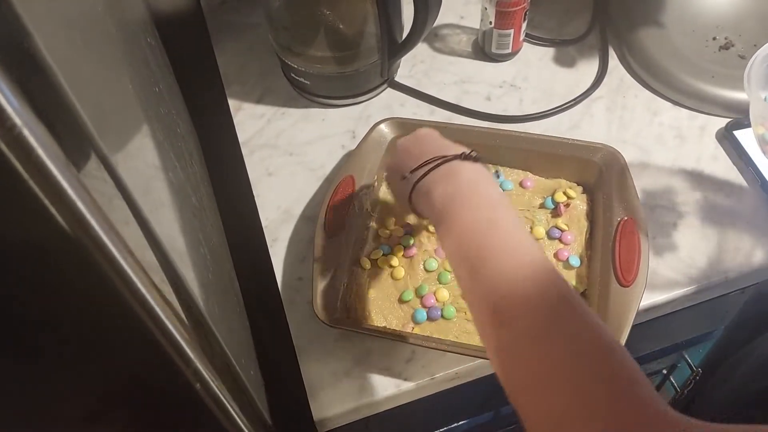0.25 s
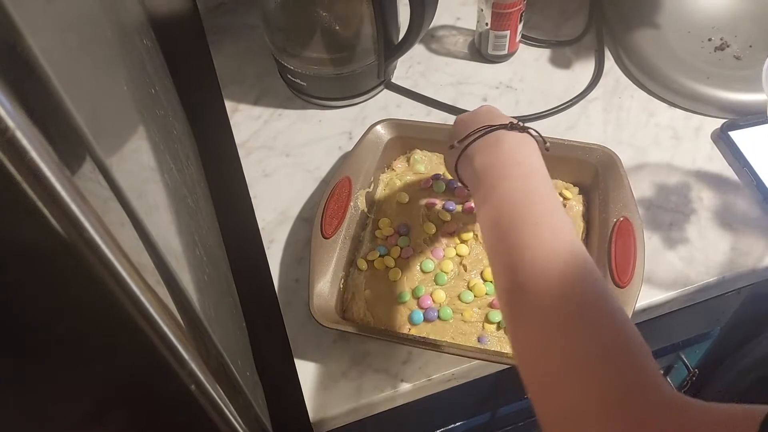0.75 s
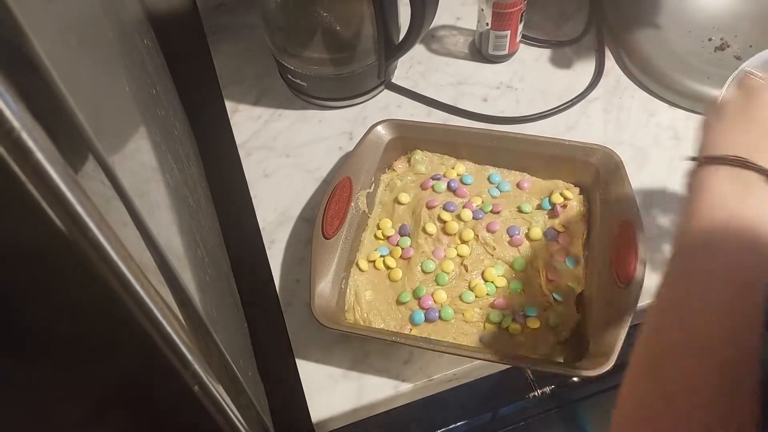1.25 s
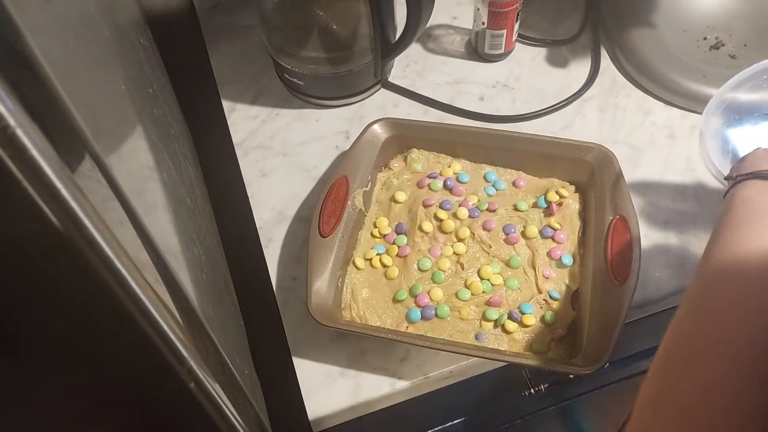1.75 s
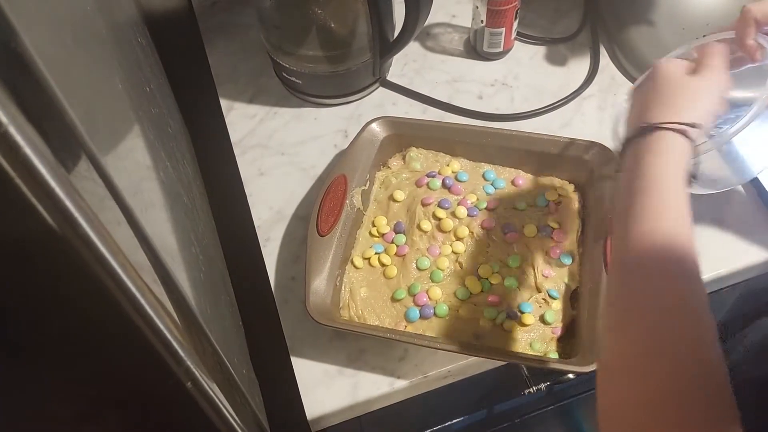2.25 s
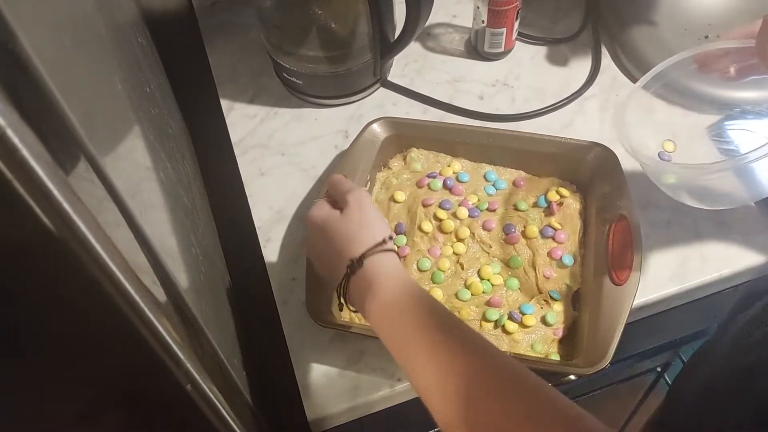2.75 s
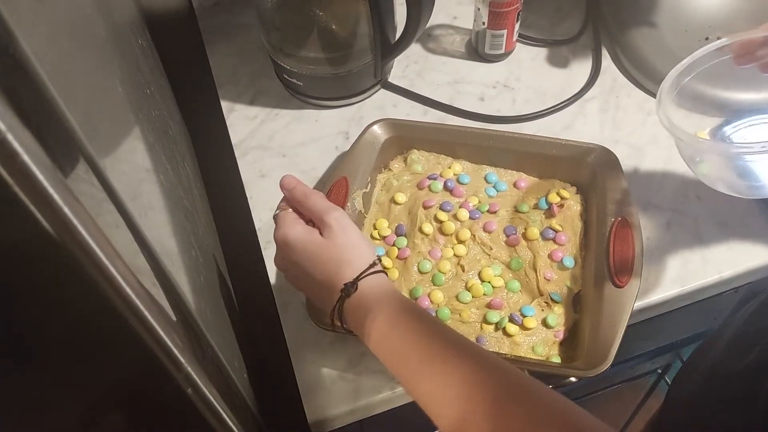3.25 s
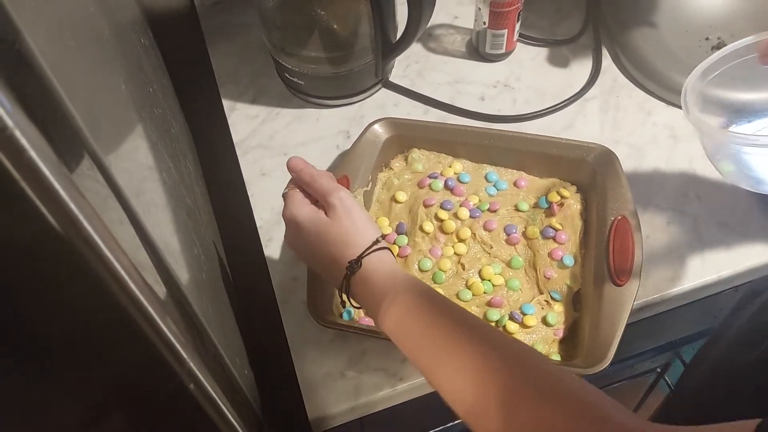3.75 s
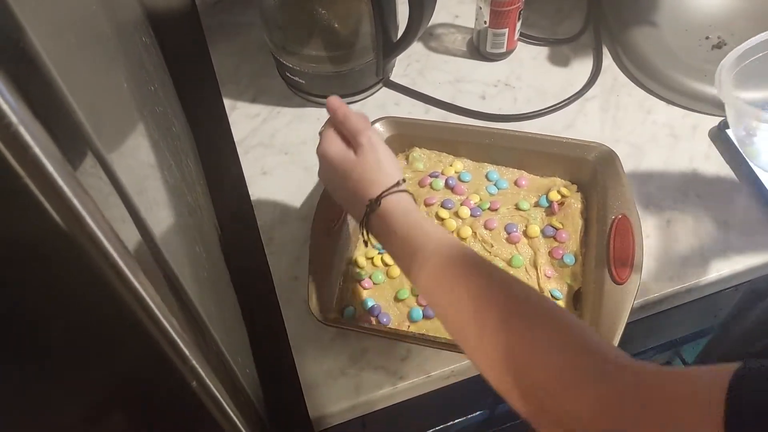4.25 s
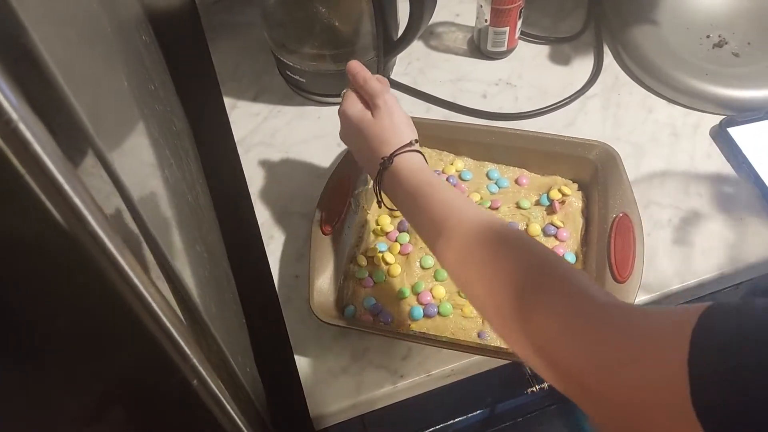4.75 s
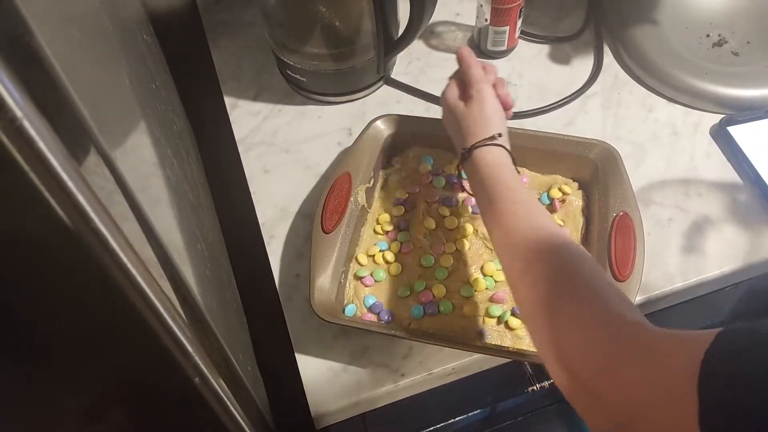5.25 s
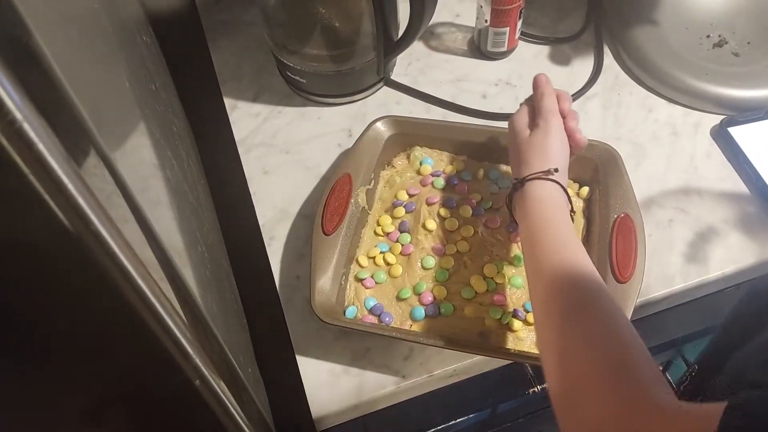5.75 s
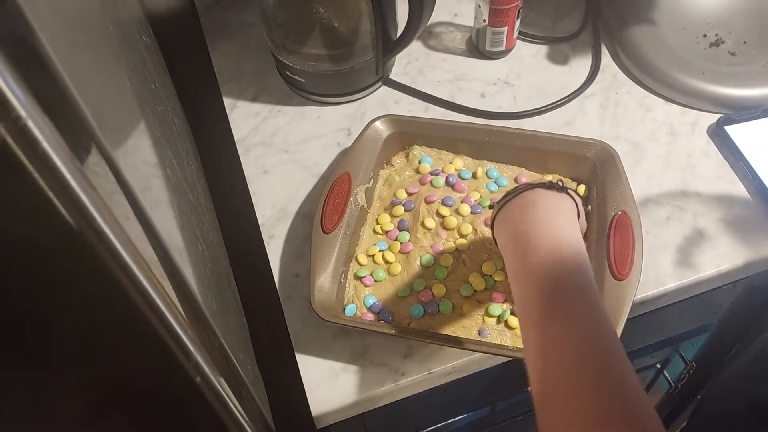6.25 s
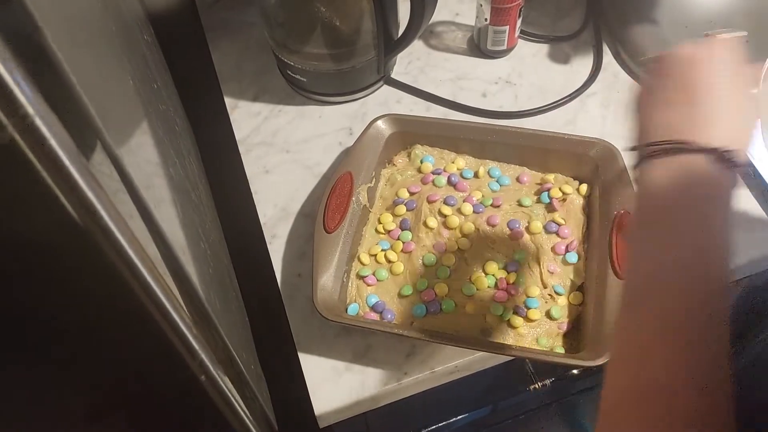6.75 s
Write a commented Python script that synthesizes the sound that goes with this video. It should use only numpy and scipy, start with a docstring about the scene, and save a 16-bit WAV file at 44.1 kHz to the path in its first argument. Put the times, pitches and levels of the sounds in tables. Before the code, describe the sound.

Hard candies tick and clack as they land in a pan of batter, with a spell of scraping and rattling in a plastic bowl.

```python
"""A small kitchen: hard candies are scraped out of a thin plastic bowl and dropped onto batter in a pan.
Their sugar shells tick against each other, and some clack on the metal, which rings. The bowl rattles
as candies hit and slide along its wall, and knocks under the fingers. Near the end, fingers press softly
into the batter. The room rings briefly after each click, over a low appliance hum. It is all heard
through a stereo microphone close above."""
import sys
import numpy as np
from scipy import signal
from scipy.fft import rfft, irfft, next_fast_len
from scipy.io import wavfile

SR = 44100
rng = np.random.default_rng(int(sys.argv[2]) if len(sys.argv) > 2 else 0)


def waveform_to_disk(signal):
    """Save audio, clipped to [-1, 1], as 16-bit WAV at the path in sys.argv[1]."""
    frames = np.transpose(np.atleast_2d(signal))
    scaled = np.clip(frames, -1, 1) * 32767
    samples = np.round(scaled).astype(np.int16)
    wavfile.write(sys.argv[1], SR, samples)


N = 308259
TIME = np.arange(N) / SR
HIT_SAMPLES = 4096
HIT_AGE, HIT_HZ = np.arange(HIT_SAMPLES) / SR, np.fft.rfftfreq(HIT_SAMPLES, 1 / SR)

# Modes are the notes an object rings at; a wider one dies sooner.
# For a candy's shell, the bowl's wall and its rim: (pitch [Hz], width [Hz], level [dB])
SHELL_MODES = [(12200, 1300, 0), (13200, 1500, -4), (14600, 1500, -12)]
WALL_MODES = [(1350, 46, -14), (1850, 29, 2), (2391, 460, -4.5), (2820, 34, 3.5), (3060, 22, -5.5),
              (3180, 30, 0), (4500, 150, -12.5)]
RIM_MODES = [(959, 40, 1.5), (1012, 16, -2), (790, 100, -5.5)]
# Tone colour of the sharp crack of a hit on shell or wall: (frequency [Hz], level [dB])
SHELL_CRACK = [(200, -39.5), (900, -27), (1800, -31.5), (4000, -39), (7500, -6), (9200, -26.5), (11000, -3),
               (12500, 6), (15500, -14.5)]
WALL_CRACK = [(100, -33), (250, -7.5), (700, -9), (1300, 0), (3000, 0.5), (4200, -1), (7500, -4.5),
              (9500, -17.5), (16000, -30)]


def gain(db):
    """Turns decibels into a factor to multiply by."""
    return 10 ** (np.asarray(db) / 20)


def curve(points, hz):
    """Reads between a table's rows, with frequency spaced in octaves."""
    f, values = np.transpose(points)
    return np.interp(np.log(np.maximum(hz, 1)), np.log(f), values)


def unit(x):
    """Scales a signal to an average power of 1."""
    return x / np.sqrt(np.mean(x ** 2))


def add(out, s, sound):
    """Mixes a short sound in at s seconds."""
    i = max(0, int(s * SR))
    n = max(0, min(sound.shape[-1], N - i))
    out[:, i:i + n] += sound[..., :n]


def sharp_filter(db):
    """A filter with these levels whose sound starts sharply, then fades (minimum phase)."""
    cepstrum = irfft(np.asarray(db) * np.log(10) / 20)
    cepstrum[1:HIT_SAMPLES // 2] *= 2
    cepstrum[HIT_SAMPLES // 2 + 1:] = 0
    return np.exp(rfft(cepstrum))


def colour(points):
    """A sharp filter drawn from (frequency [Hz], level [dB]) points."""
    return sharp_filter(curve(points, HIT_HZ))


def resonances(modes, tuning=1):
    """A filter that rings at these modes, each pitch multiplied by tuning."""
    f = HIT_HZ
    hz, width, db = np.transpose(modes)[:, :, None]
    return np.sum(gain(db) * 1j * f * width / ((hz * tuning) ** 2 - f ** 2 + 1j * f * width), axis=0)


def body(modes, crack, ring_db, tuning=1):
    """A struck object answers with a broad crack plus its ringing notes."""
    return colour(crack) + gain(ring_db) * resonances(modes, tuning)


def blow(response, db, scatter_db, fade_s, touch_s=.0001, span_s=0.0046):
    """A gritty touch, then echoes in hand, dish and counter; db is its level if spread over span_s."""
    noise = rng.standard_normal((3, HIT_SAMPLES))
    contact = noise[0] * np.exp(-HIT_AGE / touch_s)
    contact[0] = 2  # a sharp first edge
    echoes = gain(scatter_db) * unit(noise[1:] * np.exp(-HIT_AGE / fade_s))
    fade_out = np.minimum(1, 2 * (1 - HIT_AGE / HIT_AGE[-1]))
    sound = irfft(rfft(unit(contact) + echoes) * response) * fade_out
    return unit(sound) * gain(db) * np.sqrt(span_s * SR / HIT_SAMPLES)


def uneven(start, length, per_s):
    """Loosely spaced contacts, each a time and a random strength around 0."""
    chance = rng.standard_normal((32, 2))
    delays = np.abs(np.arange(32) + .3 * chance[:, 0]) / per_s
    return [(start + delay, strength) for delay, strength in zip(delays, chance[:, 1]) if delay < length]


def wander(per_s):
    """A slow random drift, roughly between -1 and 1."""
    return np.interp(TIME * per_s, np.arange(256), rng.standard_normal(256))


def appliance_hum(rumble_db, hiss_db):
    """An appliance hums and rumbles, louder on the left, along with a faint hiss."""
    # swells of the mains hum: (time [s], level [dB])
    mains_levels = [(0.0, -78), (0.41, -78), (0.66, -66), (1.6, -74.5), (2.67, -62), (3.5, -84.5),
                    (3.93, -73.5), (3.99, -102), (4.24, -68.5), (4.92, -66), (5.06, -75.5), (5.66, -71),
                    (5.72, -61.5), (6.17, -76.5), (6.46, -60), (6.99, -74)]
    # other low tones: (pitch [Hz], level [dB])
    tones = [(90, -81.5), (145, -77.5), (231, -83.5), (288.5, -79)]
    # tone colour of the rumble and the hiss: (frequency [Hz], level [dB])
    rumble_colour = [(20, -9), (40, -2.5), (80, 0), (130, 6), (200, -5.5), (310, -0.5), (400, -9.5),
                     (520, -16.5), (800, -25.5), (1500, -30.5), (5000, -44.5)]
    hiss_colour = [(500, -1.5), (1500, -5.5), (4000, -9.5), (5900, -7), (6700, 0), (7700, 4), (9300, -9),
                   (10700, 3), (12500, -0.5), (15500, -0.5)]
    mains_db = np.interp(TIME, *np.transpose(mains_levels))
    mains_hz = 60 + 1.9 * wander(8.7)
    hum = gain(mains_db) * np.sin(2 * np.pi * np.cumsum(mains_hz) / SR)
    for hz, db in tones:
        hum += gain(db + 3.5 * wander(2.9)) * np.sin(2 * np.pi * hz * TIME + 0.31 * wander(3.2))
    size = next_fast_len(N + HIT_SAMPLES, real=True)
    f = np.fft.rfftfreq(size, 1 / SR)
    noise = rfft(rng.standard_normal((3, size)))  # left, right, shared
    rumble = unit(irfft((noise[2] + 0.87 * noise[:2]) * gain(curve(rumble_colour, f)))[:, :N])
    left_db = curve([(4500, -4.0), (6800, 8), (8000, 9.5), (11000, 2), (15000, -1.5)], f)
    hiss_gains = gain(curve(hiss_colour, f) + left_db * np.array([[.5], [-.5]]))
    hiss = unit(irfft(noise[:2] * hiss_gains)[:, :N])
    return (np.sqrt(2) * hum + gain(rumble_db) * rumble) * gain([[3.5], [-5]]) + gain(hiss_db) * hiss


def shell_tick(db, scatter_db):
    """A sugar shell rings high and briefly, each at its own pitch, and chatters once before it rests."""
    shell = body(SHELL_MODES, SHELL_CRACK, ring_db=3, tuning=1 + .014 * rng.standard_normal())
    chatter = 1 + .3 * np.exp(-2j * np.pi * HIT_HZ * rng.uniform(.002, .009))
    return blow(shell * chatter, db, scatter_db, fade_s=.006, touch_s=.0003)


def candy_landing(shell_db, clack_db, db_per_octave, left_db, ring_db=-2.5):
    """A shell ticks and the pan clacks; the default ring_db is for metal muffled by batter."""
    # the metal pan's notes: (pitch [Hz], width [Hz], level [dB])
    pan_modes = [(1175, 28, -4.5), (1734, 100, 0.5), (2030, 450, -0.5), (2503, 110, -1), (2870, 36, 3),
                 (3340, 24, 4), (5800, 70, -22), (6040, 150, -21), (7160, 425, -7)]
    # tone colour of its crack: (frequency [Hz], level [dB])
    pan_crack = [(150, -21.5), (500, -18), (720, -14), (900, -17), (1200, -2), (2500, -6.5), (4500, -0.5),
                 (7300, 1), (9200, -29.5), (16000, -25.5)]
    octaves = np.log2(np.clip(HIT_HZ, 1000, 8000) / 2000)
    pan = body(pan_modes, pan_crack, ring_db) * sharp_filter(db_per_octave * octaves)
    clack = blow(pan, clack_db, scatter_db=6.5, fade_s=0.011, touch_s=0.0076)
    return (shell_tick(shell_db, scatter_db=0.5) + clack) * gain([[left_db / 2], [-left_db / 2]])


def candies_on_batter():
    """Candies fall on the batter and on one another, and each hops once."""
    # landings: (time [s], shell tick [dB], clack [dB])
    landings = [(0.0058, -29, -50), (0.2472, -44, -82), (0.3127, -25, -48.5), (0.3256, -25.5, -46),
                (0.367, -38.5, -62.5), (0.6483, -28.5, -52), (0.9335, -29, -45), (0.9637, -25.5, -42),
                (1.116, -47, -53), (1.132, -53.5, -53), (2.7487, -35.5, -69), (2.9685, -51, -80),
                (3.07, -29.5, -46.5), (3.241, -25.5, -35.5), (3.308, -23.5, -39.5), (3.6493, -47, -81),
                (3.6852, -39.5, -88), (3.8624, -52, -55), (3.9475, -25, -47), (4.6874, -36.5, -46.5),
                (4.7072, -28, -51), (4.7497, -23, -35), (4.8516, -24.5, -37), (5.0142, -35.5, -61),
                (5.0487, -22, -47), (5.139, -29.5, -48), (5.6812, -25, -45), (5.6929, -29.5, -48),
                (5.7194, -22.5, -43.5), (5.9876, -24.5, -39.5), (6.3836, -39.5, -56), (6.5576, -29, -40),
                (6.5812, -24, -36), (6.601, -29, -36), (6.61, -21.5, -42), (6.644, -30, -44.5)]
    out = np.zeros((2, N))
    for s, shell_db, clack_db in landings:
        add(out, s, candy_landing(shell_db, clack_db, db_per_octave=0.4, left_db=-2))
        hop = gain(-13) * candy_landing(shell_db, clack_db, db_per_octave=-3.0, left_db=3.0)
        add(out, s + 0.0073 * rng.uniform(.5, 1.1), hop)
    return out


def candies_in_fist():
    """Candies shift in the hand and tick faintly, some louder than others."""
    # shifts: (start [s], length [s], ticks [per s], level [dB])
    shifts = [(0.118, 0.05, 10, -52), (6.059, 0.2, 28, -45.5)]
    out = np.zeros((2, N))
    for start, length, per_s, db in shifts:
        for s, strength in uneven(start, length, per_s):
            add(out, s, gain(5 * strength) * candy_landing(db, db - 17, db_per_octave=10.5, left_db=0))
    return out


def soft_rubs(rubs, modes):
    """Gentle pushes: rubbing noise swells and fades in a dish's own notes."""
    out = np.zeros((2, N))
    for s, db, length in rubs:
        ring = unit(signal.oaconvolve(rng.standard_normal(SR), irfft(resonances(modes) ** 2))[:SR])
        age = TIME[:SR] / length
        add(out, s, ring * gain(db) * 2 * age * np.exp(1 - 2 * age))
    return out


def bowl_nudges():
    """The bowl is shifted lightly, and its rim rings softly."""
    # nudges: (time [s], level [dB], length [s])
    nudges = [(1.105, -71.5, 0.037), (6.759, -72, 0.05), (6.859, -64, 0.035)]
    return soft_rubs(nudges, RIM_MODES)


def counter_bumps():
    """Soft bumps make the counter thud at its low notes."""
    # bumps: (time [s], level [dB])
    bumps = [(1.227, -58.5), (1.674, -51), (2.35, -55), (3.351, -66), (5.059, -60)]
    out = np.zeros((2, N))
    counter = resonances([(85, 40, -1.5), (145, 41, 7), (187.0, 40, 4)]) * resonances([(125, 150, 0)])
    for s, db in bumps:
        add(out, s, blow(counter, db, scatter_db=-12, fade_s=0.0092, span_s=0.013))
    return out


def strike_bowl(shell_db, wall_db, centre_hz, hollow_db, flex_db):
    """One blow sounds a candy, the thin wall, the bowl's hollow and its low bending notes."""
    # the bowl's hollow notes and bending notes: (pitch [Hz], width [Hz], level [dB])
    hollow_modes = [(792, 44, 0), (835.8, 140, -4), (985, 27, 5)]
    flex_modes = [(293.7, 30, -2.5), (303, 100, -7), (480, 90, -12), (533, 62, -7)]
    tuning = 1 + .03 * rng.standard_normal()  # the grip changes the wall's stiffness
    # where the blow lands decides which of the wall's notes ring most
    spot = [(centre_hz / 4, -7), (centre_hz * .8, 0), (centre_hz * 0.96, -1.5), (centre_hz * 1.8, -9.5)]
    plastic = body(WALL_MODES, WALL_CRACK, ring_db=6.0, tuning=tuning) * colour(spot)
    wall = blow(plastic, wall_db, scatter_db=3, fade_s=.006, touch_s=.003)
    # a heavy push stays in contact longer and favours the lowest hollow note
    heaviness = np.clip((hollow_db + 27) / 14, 0, 1)
    contact = sharp_filter(heaviness * curve([(600, -1.5), (780, 6.0), (1000, -14.5)], HIT_HZ))
    hollow_ring = resonances(hollow_modes, np.sqrt(tuning)) * resonances([(900, 450, 0)]) * contact
    hollow = blow(hollow_ring, hollow_db, scatter_db=-4.0, fade_s=0.015, touch_s=.00003, span_s=0.0079)
    # a small bowl gives off little bass, and soft fingers add no sharp edge
    flex_ring = resonances(flex_modes, tuning) * colour([(170, -22), (270, -1.5), (400, 0), (1200, -22)])
    flex = blow(flex_ring, flex_db, scatter_db=-16.5, fade_s=0.0074, touch_s=.00003, span_s=0.0055)
    return shell_tick(shell_db, scatter_db=9.5) + wall + hollow + flex


def wall_rattle(shell_db, wall_db):
    """A candy hits the wall: a glancing blow sounds higher, a hard one brings out the low notes."""
    centre_hz = 2500 * 2 ** (0.022 * (shell_db - wall_db))
    force_db = 0.54 * (wall_db + 30)
    return strike_bowl(shell_db, wall_db, centre_hz, hollow_db=force_db - 40, flex_db=force_db - 56)


def candies_on_wall():
    """Each candy strikes the bowl's springy wall twice in quick succession."""
    # hits: (time [s], shell tick [dB], wall rattle [dB])
    hits = [(1.4454, -38, -31.5), (1.471, -47, -39), (1.6996, -30.5, -36.5), (1.7643, -31, -34),
            (1.821, -28.5, -32.5), (1.8475, -39, -44), (1.9065, -26, -32.5), (1.938, -46, -35.5),
            (1.9614, -47.5, -32), (1.981, -37.5, -37.5), (2.035, -29.5, -49), (2.125, -46, -22.5),
            (2.17, -29, -21.5), (2.231, -48, -31), (2.242, -27, -22), (2.325, -43.5, -37.5),
            (2.391, -23, -24), (2.396, -19.5, -21.5), (2.4492, -31, -26), (2.47, -28, -22.5),
            (2.4916, -43, -33.5), (2.518, -32.5, -41.5), (2.559, -32, -37.5), (2.5972, -25.5, -29.5),
            (2.6677, -33.5, -37.5)]
    out = np.zeros((2, N))
    hop = gain(-5.5)
    share = 1 / np.hypot(1, hop)  # the two contacts share the blow's energy
    for s, shell_db, wall_db in hits:
        add(out, s, share * wall_rattle(shell_db, wall_db))
        add(out, s + 0.0045 * rng.uniform(0.45, 1.5), share * hop * wall_rattle(shell_db, wall_db))
    return out


def scrape(modes, crack, size, per_s, spread_db, detune, points=8):
    """Scraping is many tiny uneven slips; each contact point has its own tone."""
    out = 0
    for _ in range(points):
        strengths = gain(spread_db * np.minimum(rng.exponential(size=size), 4))
        signs = rng.choice([-1, 1], size)
        slips = (rng.random(size) < per_s / points / SR) * strengths * signs
        response = body(modes, crack, ring_db=0, tuning=1 + detune * rng.standard_normal())
        grain = blow(response, 0, scatter_db=0, fade_s=.002, touch_s=.0007)
        out = out + signal.oaconvolve(slips[None], grain[:, :HIT_SAMPLES // 2], axes=1)[:, :size]
    return unit(out)


def finger_strokes():
    """Fingers drag candies along the plastic, so they scrape and tumble."""
    # strokes: (start [s], hold [s], shell level [dB], wall level [dB])
    strokes = [(1.448, 0.022, -40, -37.5), (1.484, 0.22, -56.5, -53.5), (1.698, 0.28, -41, -45.5),
               (2.011, 0.24, -51.5, -53), (2.361, 0.17, -47, -49.5)]
    # tone colour of the bowl's air and rim when rubbed: (frequency [Hz], level [dB])
    rub_colour = [(150, -32.5), (300, -16), (500, -20), (1000, -21), (2500, -17.5), (6000, -46)]
    out = np.zeros((2, N))
    first_s, size = strokes[0][0] - .05, 3 * SR // 2  # one stretch of scraping covers all strokes
    rise_s, fall_s = 0.0055, 0.025
    shells = scrape(SHELL_MODES, SHELL_CRACK, size, per_s=450, spread_db=2.5, detune=0.012)
    wall = scrape(WALL_MODES, WALL_CRACK, size, per_s=580, spread_db=2.5, detune=0.031)
    rim = gain(-3) * scrape(RIM_MODES, rub_colour, size, per_s=700, spread_db=2.2, detune=.02, points=3)
    for start, hold, shell_db, wall_db in strokes:
        age = first_s + TIME[:size] - start
        effort = np.exp(np.minimum(age, 0) / rise_s - np.maximum(age - hold, 0) / fall_s)
        add(out, first_s, effort * (shells * gain(shell_db) + (wall + rim) * gain(wall_db)))
        for s, strength in uneven(start, hold, per_s=30):  # candies tip over
            add(out, s, gain(3.5 + 4.5 * strength) * wall_rattle(shell_db, wall_db))
    return out


def finger_knocks():
    """Fingers knock the bowl; the harder the knock, the more its hollow note stands out."""
    # knocks: (time [s], hollow note [dB])
    knocks = [(1.457, -37), (1.5882, -32), (1.668, -30.5), (1.6771, -25), (1.835, -40), (1.964, -38.5),
              (2.0883, -25.5), (2.148, -35.5), (2.3482, -12), (2.354, -21), (2.398, -24.5), (2.4677, -22)]
    out = np.zeros((2, N))
    for s, db in knocks:
        force_db = 0.5 * (db + 28)
        add(out, s, strike_bowl(shell_db=force_db - 41, wall_db=force_db - 31.5, centre_hz=1960,
                                hollow_db=db, flex_db=force_db - 32.5))
    return out


def candies_on_metal():
    """A few candies hit the bare pan, which rings more with no batter to muffle it."""
    # hits: (time [s], shell tick [dB], clack [dB], brightness [dB per octave],
    #        left minus right [dB], ring [dB])
    hits = [(3.0999, -23.5, -28.5, -0.5, -2, 1), (3.1189, -23, -32.5, 1, -2, 7.5),
            (5.7849, -31, -24, 3, -6.5, 8.5), (5.8195, -33, -28.5, 2, -8, 13.5),
            (6.4123, -19.5, -22.5, 1.5, -0.5, -1)]
    out = np.zeros((2, N))
    for s, *hit in hits:
        add(out, s, candy_landing(*hit))
    return out


def batter_presses():
    """Fingers press into the batter, and the filled pan gives with a dull sound."""
    # presses: (time [s], level [dB], length [s])
    presses = [(6.42, -64.5, 0.077), (6.58, -62.5, 0.061)]
    # the filled pan's notes: (pitch [Hz], width [Hz], level [dB])
    batter_modes = [(239, 81, 1), (365, 170, -6)]
    return soft_rubs(presses, batter_modes)


def kitchen_echo(x, build_s):
    """Reflections build up quickly, then die away at a different speed in each frequency band."""
    # how long the room rings: (frequency [Hz], time to fade by 60 dB [s])
    ring_times = [(280, 0.36), (800, 0.23), (2500, 0.33), (6000, 0.3359), (12500, 0.22), (16000, 0.25)]
    # tone colour of the echo: (frequency [Hz], level [dB])
    echo_colour = [(100, -13), (400, -2), (900, -4.5), (2000, -4), (7000, -4.5), (12500, -12),
                   (16000, -14.5)]
    size = 8 * HIT_SAMPLES
    t, f = np.arange(size) / SR, np.fft.rfftfreq(size, 1 / SR)
    mid, side = rfft(rng.standard_normal((2, size)))
    width = np.minimum(f / 1100, 1)  # long waves reach left and right alike
    noise = (mid + width * side * np.array([[1], [-1]])) / np.sqrt(1 + width ** 2)
    noise *= gain(curve(echo_colour, f))
    tail = 0
    for band_hz, ring_s in ring_times:
        band = curve([(hz, hz == band_hz) for hz, _ in ring_times], f)
        fade = 1000 ** (-t / ring_s) * np.clip(t / build_s - .5, 0, 1)
        tail = tail + irfft(noise * band) * fade / np.sqrt(np.sum(fade ** 2))
    return signal.fftconvolve(x.mean(0)[None], tail, axes=1)[:, :N]


def microphone(x, lag_s):
    """Sound reaches the microphone's right opening first, and each opening has its own tone."""
    # balance of the two openings: (frequency [Hz], left minus right [dB])
    balance = [(60, 9.5), (200, 8), (380, 3), (700, -1), (2400, -3.5), (4400, 0.5), (7500, 7), (9500, 1.5),
               (12500, -14), (15500, 0.5)]
    gains = gain(curve(balance, HIT_HZ) * np.array([[.5], [-.5]]))
    gains /= np.sqrt(np.mean(gains ** 2, axis=0))
    delay = np.exp(-2j * np.pi * HIT_HZ * np.array([[lag_s], [0]]))
    middle = HIT_SAMPLES // 2
    response = np.roll(irfft(gains * delay), middle, axis=1)
    return signal.oaconvolve(x, response, axes=1)[:, middle:middle + N]


def scene():
    """Candies, bowl and pan sound in the kitchen, over the hum."""
    near = candies_on_batter() + candies_in_fist() + bowl_nudges() + counter_bumps() + candies_on_wall()
    near += finger_strokes() + finger_knocks() + candies_on_metal() + batter_presses()
    echo = kitchen_echo(near, build_s=0.0077)
    return microphone(near + echo, lag_s=.00025) + appliance_hum(rumble_db=-73.0, hiss_db=-74.0)


def record(dry):
    """A steep filter cuts off the highest treble."""
    top_hz = 15850
    return signal.sosfilt(signal.ellip(10, .2, 70, top_hz, fs=SR, output="sos"), dry)


dry = scene()
out = record(dry)
waveform_to_disk(out)
```